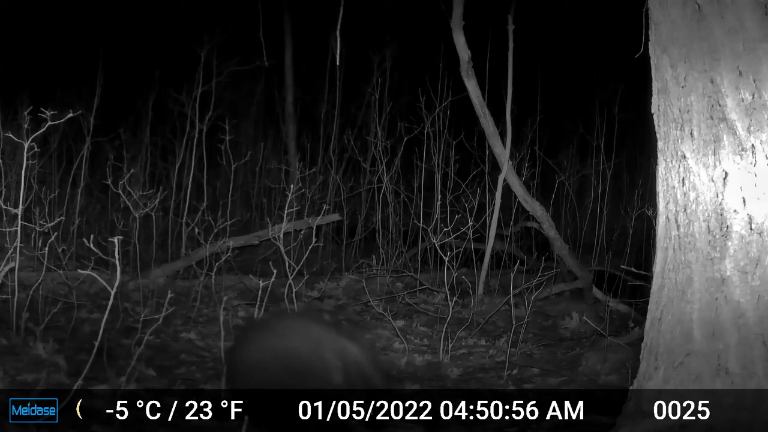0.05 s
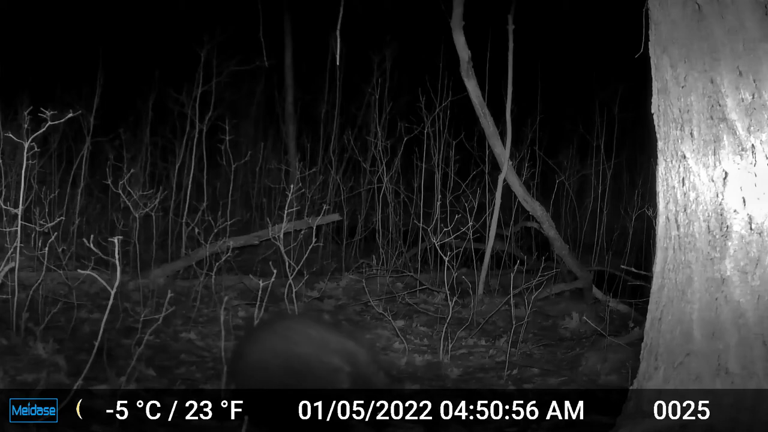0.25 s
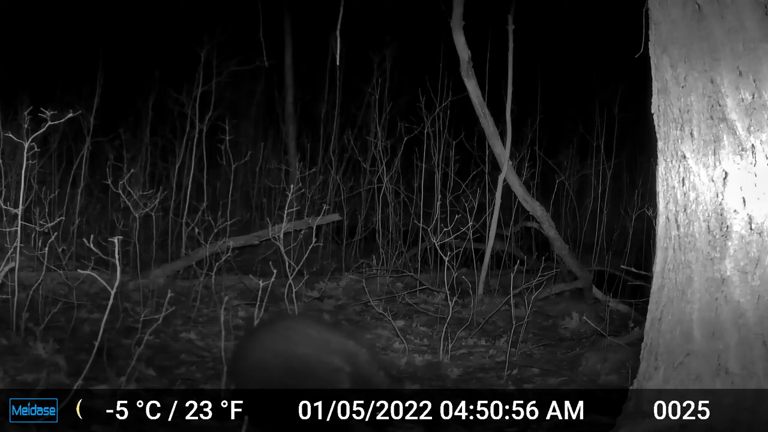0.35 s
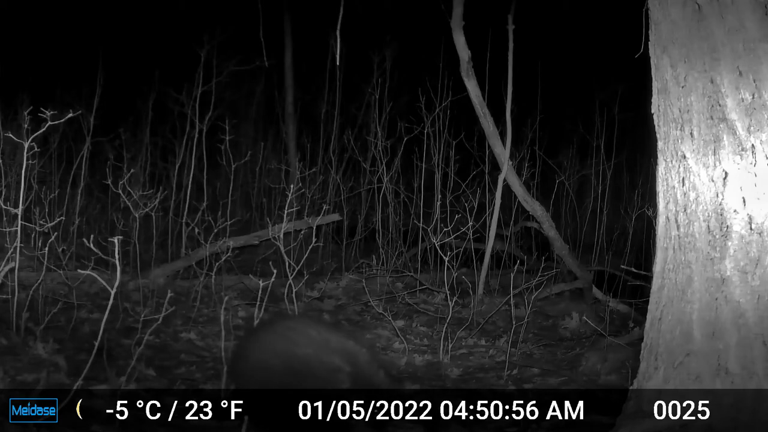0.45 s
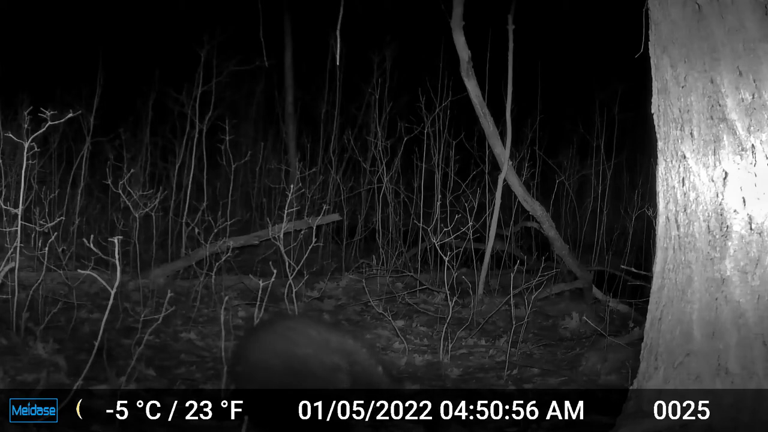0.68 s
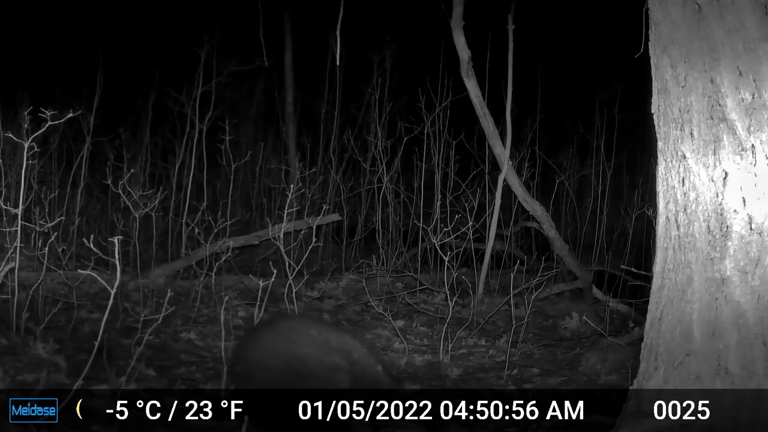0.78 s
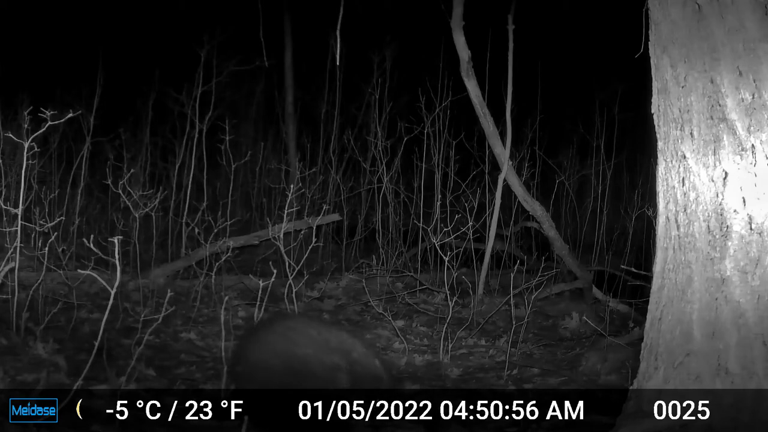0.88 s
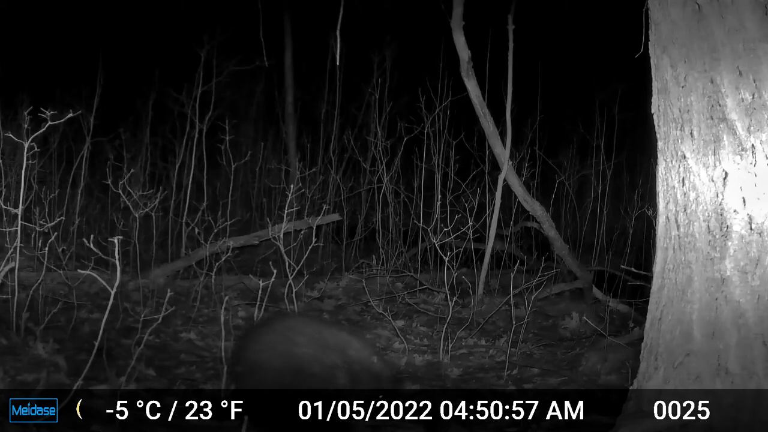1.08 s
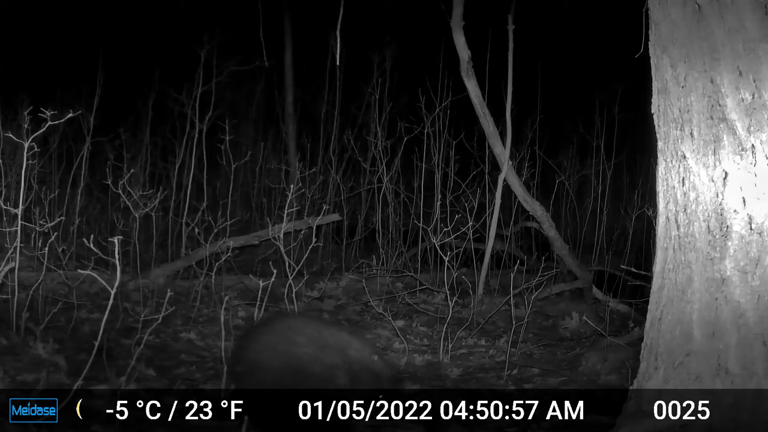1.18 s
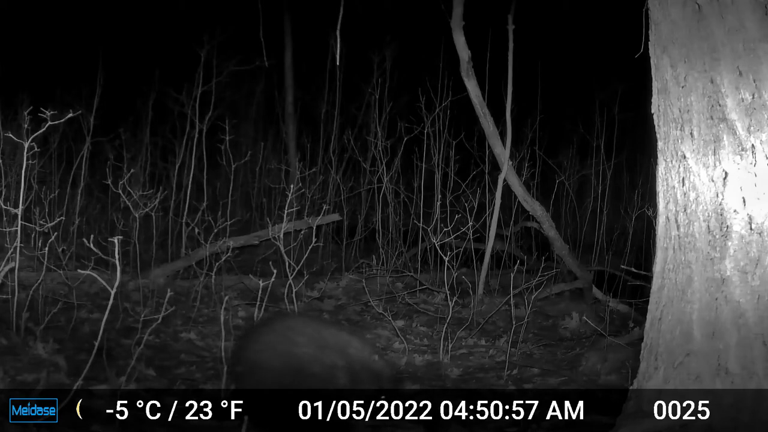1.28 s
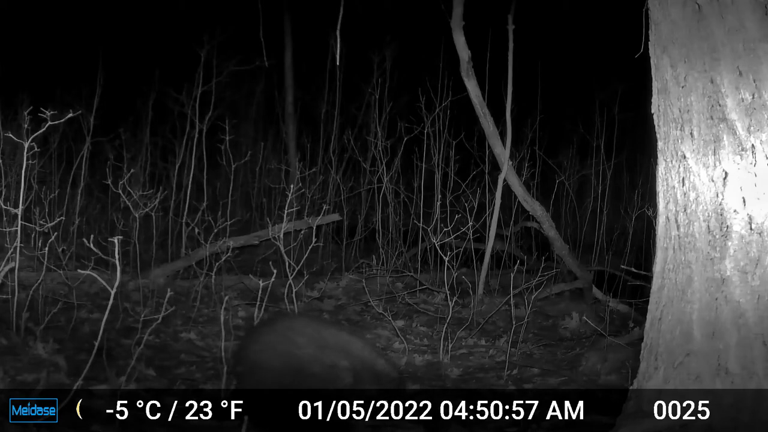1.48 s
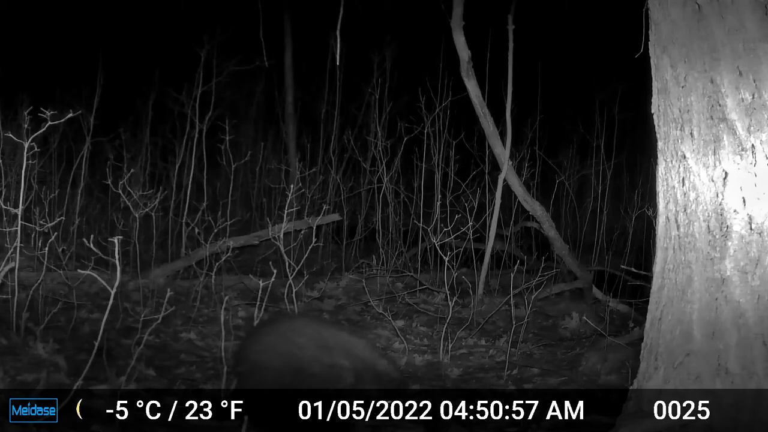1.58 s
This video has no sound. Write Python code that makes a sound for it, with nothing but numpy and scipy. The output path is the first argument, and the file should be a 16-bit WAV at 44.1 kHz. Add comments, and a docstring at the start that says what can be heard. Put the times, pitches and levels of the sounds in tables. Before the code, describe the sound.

Dry leaves crackle in short bursts under a small animal, over a low rumble.

```python
"""Frozen leaf litter at night, close to a trail camera: a small animal noses through it.
Leaves crumple in bursts of tiny fractures, dry stalks snap and ring, its body shuffles and pads.
Under it lie a low rumble, a hum and the narrow-band microphone's hiss, fading in together.
A faint tone wavers for a moment, and the camera's electronics tick."""
import sys
import numpy as np
from scipy import signal
from scipy.fft import rfft, irfft
from scipy.io import wavfile

SR = 44100
rng = np.random.default_rng(int(sys.argv[2]) if len(sys.argv) > 2 else 0)


def waveform_to_disk(signal):
    """Save audio, clipped to [-1, 1], as 16-bit WAV at the path in sys.argv[1]."""
    frames = np.transpose(np.atleast_2d(signal))
    scaled = np.clip(frames, -1, 1) * 32767
    samples = np.round(scaled).astype(np.int16)
    wavfile.write(sys.argv[1], SR, samples)


N = 72765
FFT_SIZE = 81920
TIME_S, BINS_HZ = np.arange(N) / SR, np.fft.rfftfreq(FFT_SIZE, 1 / SR)


def amp(db):
    """Decibels to gain."""
    return 10 ** (np.asarray(db) / 20)


def unit(x):
    """Scale to rms 1."""
    return x / np.sqrt(np.mean(x ** 2) + 1e-20)


def level(points):
    """Gain over time from (s, dB) points."""
    return amp(np.interp(TIME_S, *np.transpose(points)))


def spectrum(points):
    """Gain per FFT bin from (Hz, dB) points."""
    hz, db = np.transpose(points)
    return amp(np.interp(np.log(BINS_HZ + 1), np.log(hz + 1), db))


def colour(x, points):
    """Filter x by (Hz, dB) points."""
    return irfft(rfft(x, FFT_SIZE) * spectrum(points))[:N]


def noise(points):
    """Noise of rms 1, shaped by (Hz, dB) points."""
    return unit(colour(rng.standard_normal(N), points))


def lowpass(x, hz):
    """Steep band limit."""
    return signal.fftconvolve(x, signal.firwin(255, hz, window=("kaiser", 8), fs=SR), "same")


def add(mix, start_s, sound):
    """Mix a sound in at start_s."""
    part = mix[max(round(start_s * SR), 0):][:len(sound)]
    part += sound[:len(part)]


def ring(hz, swell_s):
    """Damped vibration whose envelope peaks at swell_s."""
    t = np.arange(0, 10 * swell_s, 1 / SR)
    return t / swell_s * np.exp(1 - t / swell_s) * np.sin(2 * np.pi * hz * t)


def blows(rows):
    """One damped vibration per row."""
    out = np.zeros(N)
    for start_s, db, hz, swell_s in rows:
        add(out, start_s, amp(db) * ring(hz, swell_s))
    return out


def echoes(x, t60_s):
    """Diffuse reflections, starting after 1 ms."""
    t = np.arange(SR // 2) / SR
    tail = rng.standard_normal(len(t)) * amp(-60 * t / t60_s) * (t > .001)
    return signal.fftconvolve(x, tail / np.linalg.norm(tail))[:N]


def night(hum_hz=118.65):
    """Distant rumble, wavering hum and microphone hiss under one fade-in."""
    # Spectra. Each row: frequency in Hz, gain in dB.
    rumble = [(12, -37), (24, -3), (60, -3), (85, -2), (115, -1.5), (150, -5), (200, -6), (310, -15.5),
              (450, -17.5), (650, -16.5), (850, -17), (1100, -28.5), (1500, -37.5), (2500, -51.5)]
    hiss = [(300, -19.5), (1200, -1), (2500, 0.5), (4000, 0.5), (5500, -0.5), (7200, -2), (8500, -6.5)]
    # Each row: time in seconds, gain in dB.
    fade_in = [(0, -35), (.02, -8), (.06, -10), (.11, -1.5), (.16, 1)]
    waver = noise([(1, 0), (8, 0), (20, -40), (60, -100)])
    hum = unit(waver * np.sin(2 * np.pi * hum_hz * TIME_S))
    return level(fade_in) * (amp(-43.5) * noise(rumble) + amp(-53.5) * hum + amp(-61) * noise(hiss))


def crackle(grains_per_s=6500, clump_db=2, spread_db=2.5, pitch_count=16):
    """Tiny leaf fractures of uneven size, in clumps; each rings briefly at one pitch."""
    clicks = (rng.random(N) < grains_per_s / SR) * rng.choice([-1, 1], N)
    clumps = noise([(1, 0), (150, 0), (400, -30), (1000, -80)])
    sizes = np.minimum(rng.exponential(1, N), 3)
    clicks = clicks * amp(clump_db * clumps + spread_db * sizes)
    pitch_index = rng.integers(0, pitch_count, N)
    rings = [ring(hz, swell_s=0.00012) for hz in np.linspace(850, 8950, pitch_count)]
    return sum(np.convolve(clicks * (pitch_index == k), grain)[:N] for k, grain in enumerate(rings))


def rustles(band_octaves=0.34):
    """Each push into the leaves swells and dies away, with one band lifted or cut."""
    # Each row: peak time, rise and fall in seconds, level in dB, band centre in Hz, band gain in dB.
    pushes = [(0.024, 0.0079, 0.0081, -58.5, 4800, 4), (.155, 0.015, 0.021, -58.5, 4530, 0),
              (0.2407, 0.0093, 0.0074, -25.5, 6100, 7), (0.252, 0.022, 0.041, -33, 5070, 3.5),
              (0.313, 0.013, 0.018, -45, 6200, -10), (0.379, 0.017, 0.015, -41, 4650, 3),
              (0.432, 0.031, 0.041, -48, 3280, 5.5), (0.53, 0.0045, 0.005, -48, 7400, 8),
              (0.681, 0.0024, 0.011, -48, 5200, 16), (.687, 0.0057, 0.015, -48.5, 1770, 15.5),
              (.975, 0.027, .015, -60, 6300, -6), (1.007, .006, 0.018, -52, 6000, 13),
              (1.047, 0.0059, 0.0046, -50, 1410, 24), (1.076, 0.0037, 0.022, -44, 3080, 20),
              (1.082, 0.007, 0.0081, -36.5, 5500, 21.5), (1.104, 0.0068, 0.0083, -36, 5540, 14),
              (1.139, 0.003, 0.0099, -33.5, 6350, 6.5), (1.298, 0.01, 0.0089, -58.5, 1850, 9)]
    # Each row: frequency in Hz, gain in dB.
    leaf_colour = [(300, -52), (1100, -6), (1500, 3.5), (2600, -0.5), (4000, 2), (5500, -4), (7000, -3),
                   (8500, -10)]
    leaf_spectrum = rfft(crackle(), FFT_SIZE) * spectrum(leaf_colour)
    out = np.zeros(N)
    for peak_s, rise_s, fall_s, db, band_hz, band_db in pushes:
        octaves = np.log2((BINS_HZ + 1) / band_hz)
        band = amp(band_db * np.exp(-.5 * (octaves / band_octaves) ** 2))
        grains = unit(irfft(leaf_spectrum * band)[:N])
        envelope = np.exp(-np.maximum((peak_s - TIME_S) / rise_s, (TIME_S - peak_s) / fall_s))
        out += amp(db) * envelope * np.roll(grains, rng.integers(N))
    return out


def body():
    """Dull shuffling over the ground, and low bumps as the animal shifts its weight."""
    # Each row: time in seconds, level in dB.
    shuffle = [(.1, -75), (.17, -47), (.22, -37), (.35, -36.5), (.49, -36), (.56, -46.5), (.66, -65),
               (.8, -59)]
    # Each row: frequency in Hz, gain in dB.
    shuffle_colour = [(30, -4.5), (100, 3), (180, -1.5), (280, -7.5), (450, -10.5), (700, -10.5),
                      (920, -13.5), (1200, -24.5), (3000, -54.5)]
    # Each row: start in seconds, level in dB, pitch in Hz, swell in seconds.
    pads = [(.205, -32.5, 74, 0.017), (.265, -40, 115, 0.0095), (.325, -28, 46.4, 0.016),
            (.425, -34.5, 51.3, 0.019), (.455, -35.5, 200, 0.0088), (.565, -29, 127, 0.01),
            (.658, -28.5, 83, 0.0067), (.735, -35, 54, 0.0069), (.83, -30.5, 48.5, .016),
            (1.128, -29, 63.4, 0.0029), (1.23, -34.5, 54, 0.011), (1.335, -31.5, 53.6, 0.0042)]
    return level(shuffle) * noise(shuffle_colour) + blows(pads)


def snaps():
    """Stalks and leaf edges break, each ringing at one or more pitches."""
    # Each row: start in seconds, level before colouring in dB, pitch in Hz, swell in seconds.
    modes = [(.2282, -23, 6400, 0.000089), (.2298, -22.5, 6260, 0.00012), (.2350, -29, 4330, 0.00027),
             (.2380, -7.5, 2240, 0.00013), (.2402, -10.5, 4000, 0.0002), (.2420, -45, 3540, 0.00014),
             (.2447, -21.5, 4400, 0.0004), (.2527, -22, 1690, 0.00038), (.2568, -21, 4300, 0.00043),
             (.2665, -16, 6200, 0.000047), (.2722, -25, 4400, 0.00024), (.2933, -29.5, 5200, 0.00024),
             (.3143, -31, 6200, 0.00024), (.3368, -28.5, 6460, 0.000039), (.3704, -24, 3860, 0.000053),
             (.3773, -29.5, 5400, 0.00017), (.3795, -36, 6500, .0002), (.3970, -30, 4200, 0.00012),
             (.4025, -33, 3360, 0.00023), (.4250, -31.5, 4440, 0.000098), (.4425, -38, 4220, 0.00015),
             (.468, -42, 3370, 0.00034), (.5215, -37.5, 2370, .0011), (.5217, -38.5, 3500, 0.0013),
             (.5218, -37, 4610, 0.00062), (.5460, -35.5, 6000, 0.000035), (.6020, -45.5, 5300, .00015),
             (.7140, -53.5, 1424, 0.0033), (.7140, -47.5, 4490, 0.0016), (.7143, -43, 6094, 0.00032),
             (.9738, -40.5, 5770, 0.00026), (1.0068, -40, 5970, 0.00037), (1.0680, -48, 2580, 0.00097),
             (1.0745, -35.5, 4050, 0.00045), (1.0775, -32.5, 4300, 0.00026), (1.0841, -27.5, 4840, 0.00027),
             (1.0865, -30, 5960, 0.00045), (1.0930, -26.5, 6270, 0.00022), (1.0998, -23, 5830, 0.00036),
             (1.1342, -32, 4740, 0.00028), (1.1362, -22.5, 2980, 0.00024), (1.1364, -20, 5460, 0.00022),
             (1.1365, -25.5, 1970, 0.00046), (1.1415, -23, 6440, 0.00018), (1.15, -49.5, 3780, 0.0045),
             (1.2110, -39, 5020, 0.000045)]
    # Each row: frequency in Hz, gain in dB.
    snap_colour = [(200, -52), (800, -12), (1250, 2.5), (1500, 3), (2600, -2), (4000, 2.5), (8000, 3)]
    return colour(blows(modes), snap_colour)


def ticks():
    """Thin impulses in the camera's electronics."""
    # Each row: time in seconds, level before colouring in dB.
    impulses = [(0.263, -48), (.3118, -51), (.4557, -59), (0.6952, -61), (0.7432, -50.5), (1.032, -64)]
    # Each row: frequency in Hz, gain in dB.
    tick_colour = [(1000, 22.5), (8000, 20.5), (12000, 11), (16000, 0)]
    out = np.zeros(N)
    for start_s, db in impulses:
        add(out, start_s, amp([db]))
    return colour(out, tick_colour)


def tone(roughness=0.45, jitter_hz=15):
    """Faint, rough tone that wanders and trembles in pitch."""
    # Each row: time in seconds, pitch in Hz, level in dB.
    contour = [(.34, 676, -78), (0.386, 698.3, -46), (0.45, 602.6, -60), (0.51, 573.3, -48.5),
               (.545, 581, -44.5), (0.557, 593, -71), (.584, 628, -50), (0.615, 595, -44.5),
               (0.624, 627, -63), (0.715, 673.4, -53), (0.737, 643.5, -49), (0.788, 521, -62)]
    times_s, hz, db = np.transpose(contour)
    flutter, jitter = (noise([(1, 0), (60, 0), (150, -40), (400, -100)]) for _ in range(2))
    pitch_hz = np.interp(TIME_S, times_s, hz) + jitter_hz * jitter
    wave = unit(np.sin(2 * np.pi * np.cumsum(pitch_hz) / SR))
    gate = (TIME_S > times_s[0]) * (TIME_S < times_s[-1])
    return gate * (1 + roughness * flutter) * amp(np.interp(TIME_S, times_s, db)) * wave


def scene():
    """The animal over the night background; ground and trunks scatter the litter's sound."""
    cracks = snaps()
    litter = rustles() + cracks + amp(-8.5) * echoes(cracks, t60_s=0.0061)
    woods = amp(-16) * echoes(litter, t60_s=0.16)
    return (litter + woods + body() + tone() + night())[None]


def record(dry):
    """Narrow-band microphone with slight peak rounding, then ticks and a final band limit."""
    # Microphone response. Each row: frequency in Hz, gain in dB.
    response = [(10, -7), (25, -2.5), (7300, 0), (7900, -6), (8600, -13.5), (9200, -28)]
    heard = lowpass(colour(dry[0], response), hz=9000)
    ceiling = 3
    rounded = ceiling * np.tanh(heard / ceiling)
    return lowpass(rounded + ticks(), hz=15800)[None]


dry = scene()
out = record(dry)
waveform_to_disk(out)
```